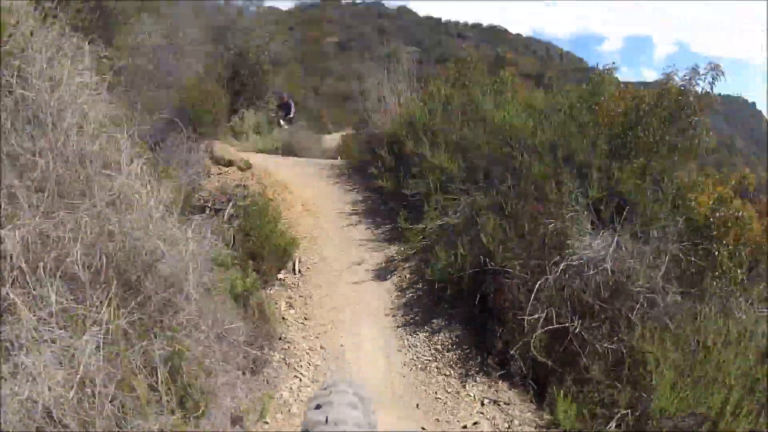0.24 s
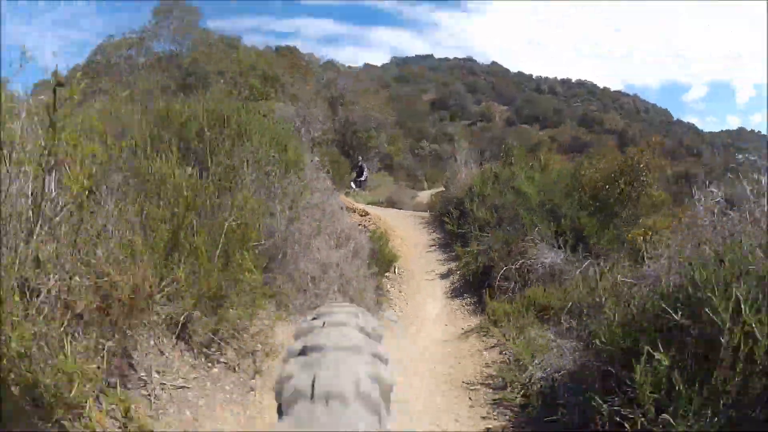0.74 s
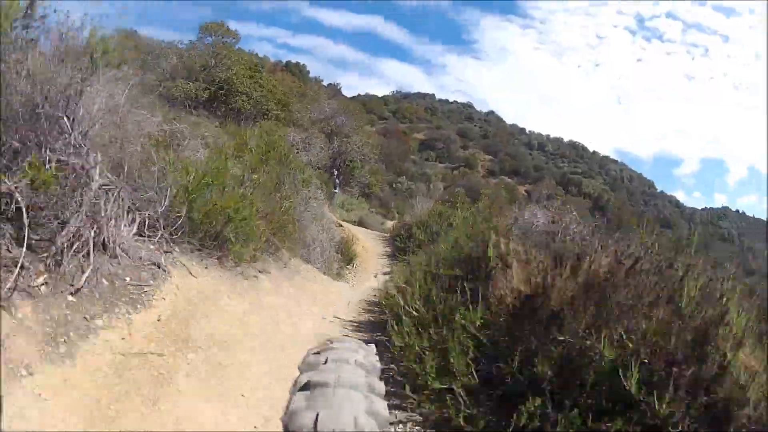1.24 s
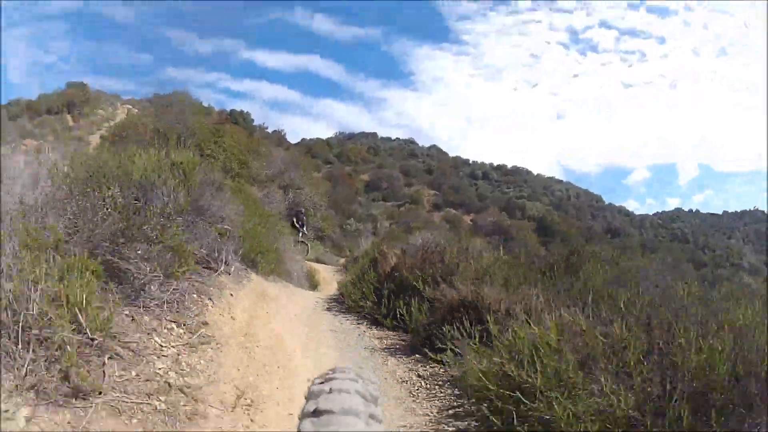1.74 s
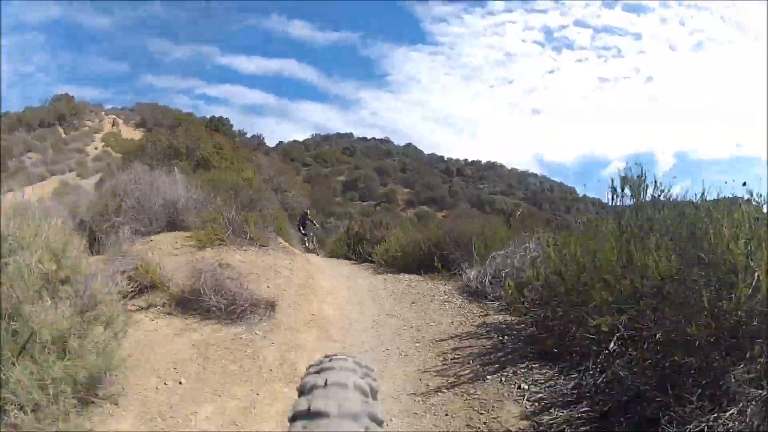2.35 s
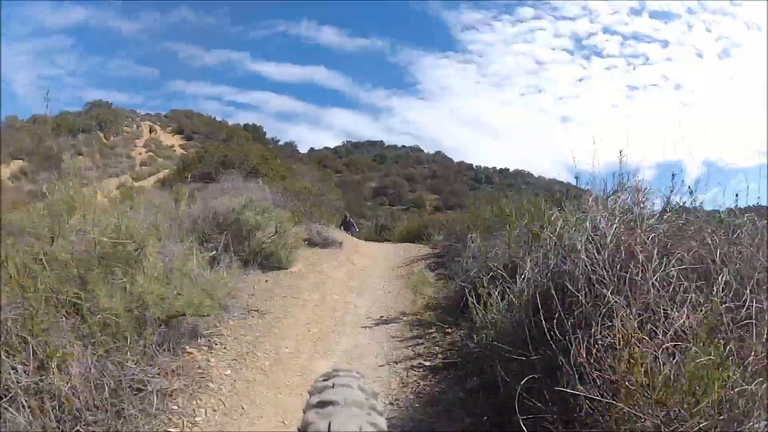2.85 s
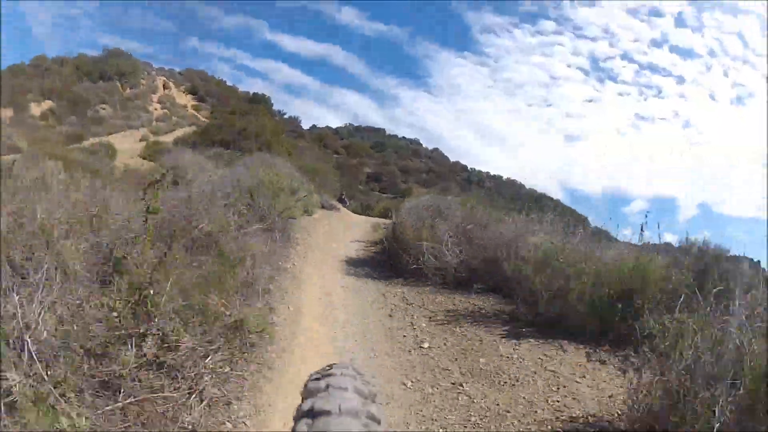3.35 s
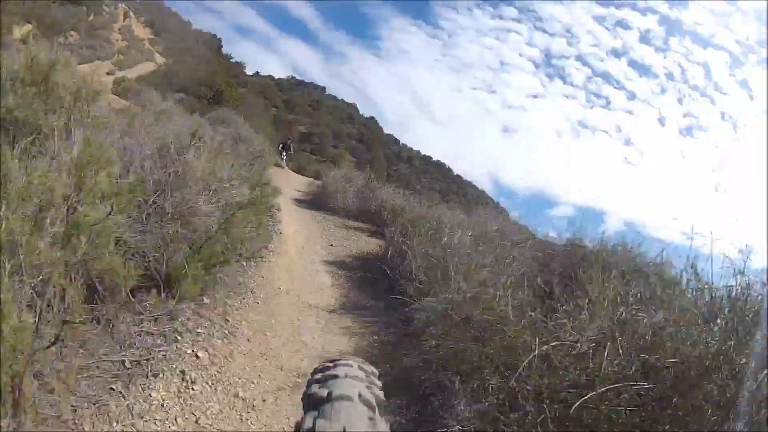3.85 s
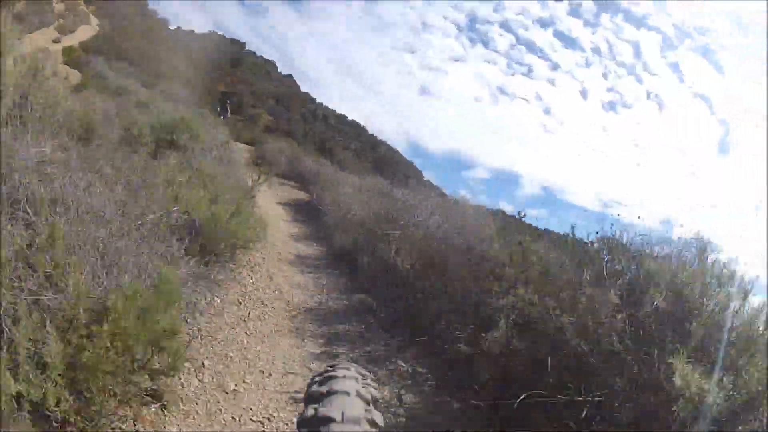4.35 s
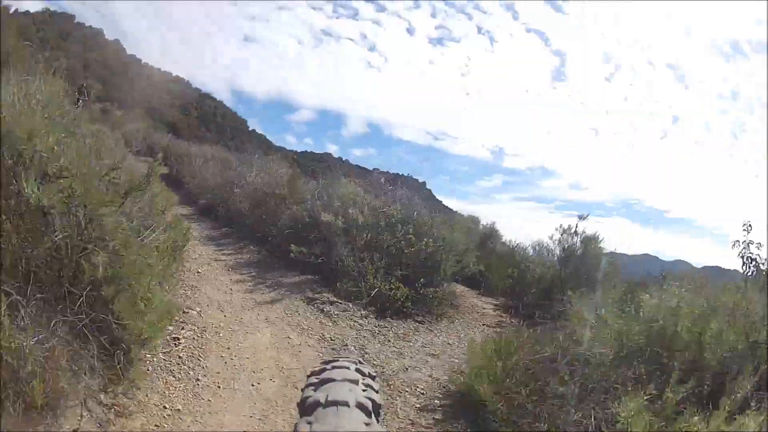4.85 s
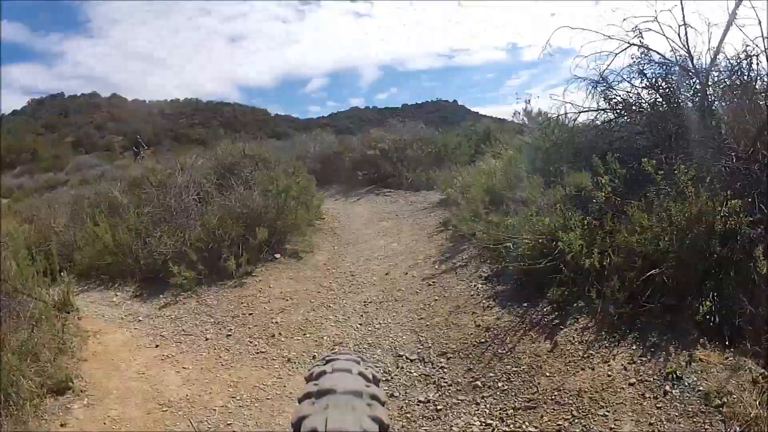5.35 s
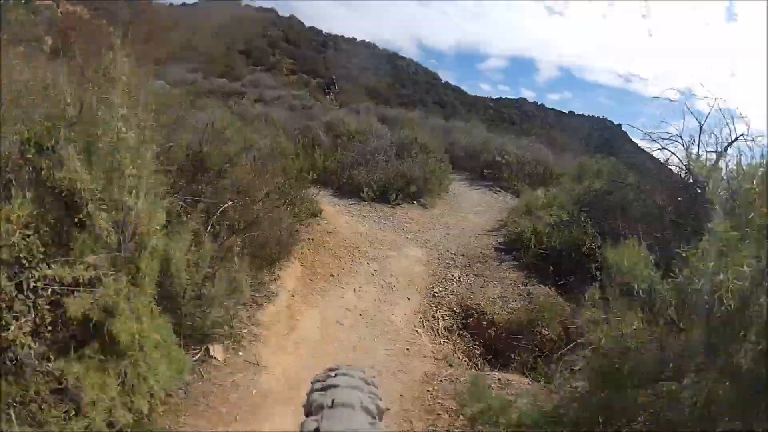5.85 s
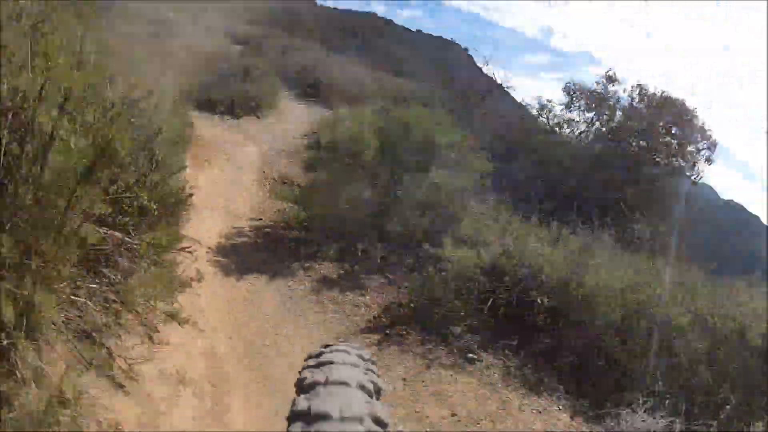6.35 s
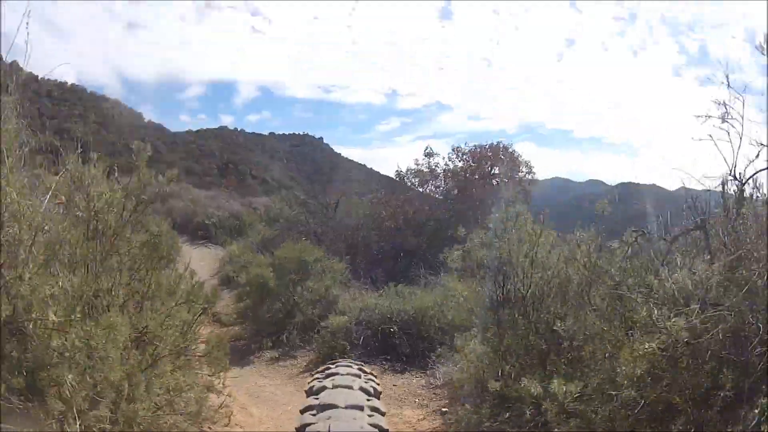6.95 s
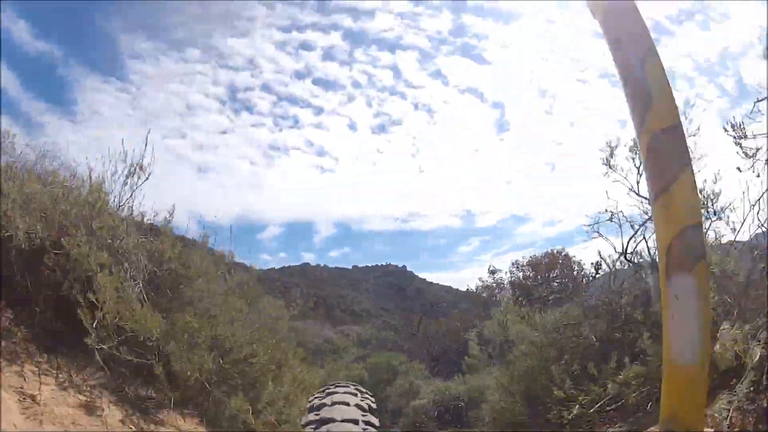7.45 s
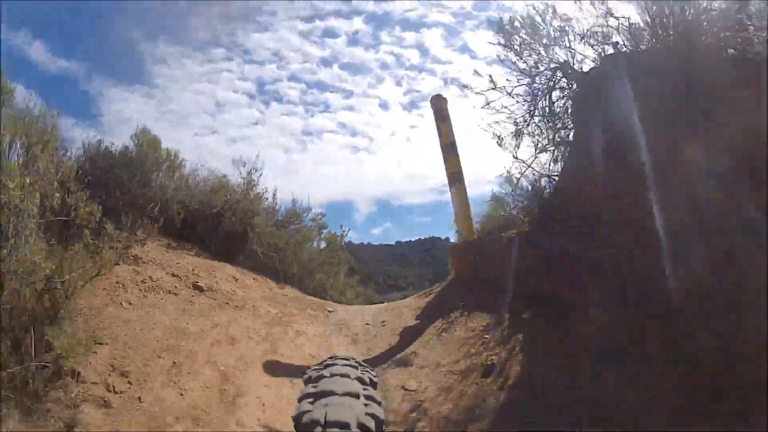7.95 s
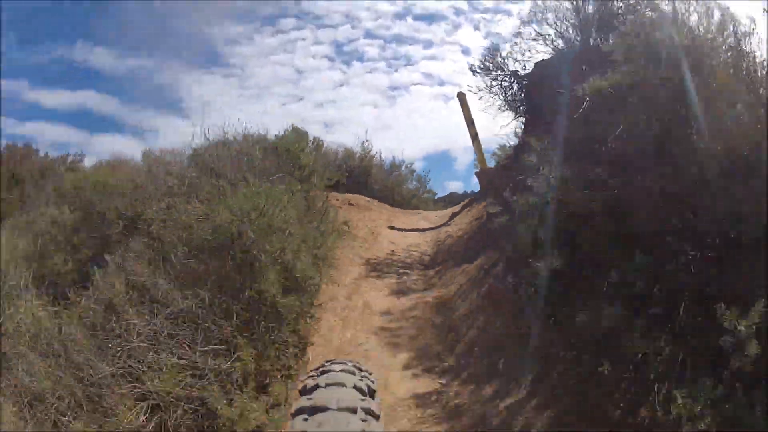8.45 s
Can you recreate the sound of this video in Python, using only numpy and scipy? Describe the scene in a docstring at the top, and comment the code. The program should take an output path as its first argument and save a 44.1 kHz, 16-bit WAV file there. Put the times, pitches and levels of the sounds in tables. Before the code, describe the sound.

Gritty, boxy action-camera sound of a bike on rocky dirt: droning shaky rumble, irregular hard clacks and rattles, muffled thuds, thin gravel hiss.

```python
"""A mount boom on a mountain bike sways in two low bending modes, noise-driven, on a rough dirt trail.
The camera's sound comes through the clamp and housing: lumpy rumble of tyre and wind, gravel noise
ringing the housing modes, a loose part knocking on them, dull damped thumps of stones, rough hums.
The recorder ducks after strong sharp sounds, clips, and holds every sample of a slow converter."""
import sys
import numpy as np
from scipy import signal
from scipy.fft import rfft, irfft
from scipy.io import wavfile
from scipy.ndimage import uniform_filter1d

SR = 44100
rng = np.random.default_rng(int(sys.argv[2]) if len(sys.argv) > 2 else 0)


def master(y):
    """Save y as 16-bit WAV."""
    cut = np.clip(np.atleast_2d(y).T, -1, 1)
    pcm = np.round(cut * 32767)  # scale
    wavfile.write(sys.argv[1], SR, pcm.astype(np.int16))


N = 383222

# low mount mode along the trail: time_s, level_db
SWAY = [(0.0, -33), (0.51, -29), (0.84, -40), (1.01, -31.5), (1.74, -43.5), (2.15, -26), (2.35, -38),
        (2.42, -29), (2.66, -37.5), (3.95, -29), (4.09, -34.5), (4.36, -25), (4.55, -38.5), (4.62, -26),
        (4.74, -44.5), (4.81, -30), (4.98, -26), (5.13, -34.5), (5.3, -25), (5.66, -47.5), (5.95, -26.5),
        (6.05, -37), (6.17, -27.5), (6.34, -40), (6.61, -35), (7.07, -43.5), (7.33, -30.5), (7.43, -40),
        (7.53, -27), (7.67, -42), (7.91, -28.5), (8.08, -39.5), (8.18, -28), (8.69, -35)]
# upper mount mode along the trail: time_s, level_db
BOUNCE = [(0.0, -41.5), (0.53, -28.5), (0.6, -35.5), (0.82, -25), (0.87, -51), (0.94, -30), (1.09, -35),
          (1.16, -28), (1.21, -48), (1.28, -30.5), (1.33, -41.5), (1.43, -28.5), (1.84, -33.5),
          (1.91, -26.5), (2.13, -34.5), (2.47, -31), (2.52, -40.5), (2.61, -30.5), (4.01, -31), (4.11, -39),
          (4.16, -28.5), (4.45, -44.5), (4.53, -32), (5.42, -37.5), (5.44, -31), (5.64, -51.5),
          (6.02, -31.5), (6.05, -37.5), (6.22, -32.5), (6.75, -42.5), (6.8, -34), (7.02, -56), (7.16, -43),
          (7.62, -35.5), (7.65, -23), (7.72, -39.5), (7.89, -32), (8.06, -37), (8.15, -34), (8.69, -39)]
# housing modes: centre_hz, width_hz, gravel_db (relative), knock_db (relative)
HOUSING = [(342, 10.4, -5, -20), (536.5, 90, 2.5, -25), (770, 59, -1, -7.5), (940, 57, 3, -10),
           (1055, 120, -2.5, -6), (1698, 163, -3, 4.5), (2049, 93, -12, -4), (2387, 136, -7.5, -3),
           (2517, 30, -22, -12), (3084, 53, -32, -13.5), (2964, 330, -11, -20), (3450, 210, -14, -10.5),
           (3480, 320, -26, -5.5)]
# gravel under the tyre: time_s, buzz_db
GRAVEL = [(0.0, -61), (0.22, -57.5), (0.36, -52.5), (0.58, -55.5), (0.72, -64.5), (1.55, -54),
          (1.67, -50.5), (1.84, -66), (2.05, -55.5), (2.54, -53), (2.98, -50.5), (3.56, -50.5), (3.82, -52),
          (4.14, -47.5), (4.31, -53), (4.72, -52), (5.49, -53.5), (5.93, -59.5), (6.41, -52), (6.61, -57.5),
          (6.85, -67), (7.07, -66), (7.45, -49.5), (7.6, -49), (7.96, -54), (8.15, -56), (8.3, -48.5),
          (8.69, -52.5)]
# loose part against the housing: start_s, level_db, length_s, tilt_db_per_octave, middle_ring_db
KNOCKS = [(.0144, -31.5, 0.0011, -7, 20), (0.127, -35.5, 0.0008, 15, 1), (.2276, -32.5, 0.0047, 15, 2),
          (0.3017, -29.5, 0.0061, 12, 6), (0.353, -43, 0.0072, 13, 12), (0.413, -43, 0.002, 9, 0),
          (0.464, -40, 0.0096, -3, 5), (0.599, -39, 0.021, 11, 5), (0.648, -34.5, 0.0031, -4, -10),
          (0.714, -47, 0.0084, -8, 5), (0.927, -28.5, 0.0077, 2.5, -17), (0.976, -31, .006, 7, -7),
          (1.1945, -20, .0057, -5, 12.5), (1.321, -37, 0.0056, 4, -12), (1.6398, -19, 0.0071, -3, 14),
          (1.7196, -22.5, 0.0032, 5.5, 4), (1.839, -42.5, .0074, -3, -10), (1.892, -40, 0.0052, 9.5, -9),
          (2.279, -38.5, 0.0047, -7.5, -18), (2.674, -35, 0.0059, 7, -3), (2.699, -39, .0056, 3, -5),
          (2.7364, -36, 0.0037, 11, 2), (2.817, -38, 0.0028, 6, -3), (2.8486, -40, 0.0039, 10, -4),
          (2.888, -34.5, 0.011, 1, -10), (3.5463, -34.5, 0.0031, 4, -7), (3.8407, -29, 0.0034, 3, -11),
          (3.973, -33, 0.0027, 3, -13), (4.083, -24, 0.004, 1, 10), (4.19, -45, 0.0037, 10, -5),
          (4.2757, -29.5, 0.0026, -4.5, -6), (4.398, -43.5, 0.0073, -12, 10),
          (4.577, -41.5, .0067, -5, -11), (4.642, -33.5, 0.0049, 9, -7), (4.71, -40, 0.015, -0.5, -1),
          (4.796, -38, 0.0095, -3, 0), (4.812, -30, 0.0084, 2, -11), (5.091, -23, 0.0052, -1.5, 6),
          (5.1228, -19.5, .0036, -4, 5), (5.18, -37, .0055, -5, -6), (5.316, -33, 0.005, 8, -6),
          (5.3394, -22.5, 0.0034, 2, -3), (5.481, -19.5, 0.0055, 2.5, -1), (5.571, -39, .0084, 10, 1),
          (5.6014, -17, .006, 17.5, 15), (5.721, -27.5, 0.0025, 18, 4), (5.824, -47, 0.0079, 22, 4),
          (5.898, -39.5, 0.008, -5.5, -15), (6.0445, -19.5, 0.0059, 1.5, 3.5),
          (6.114, -34.5, 0.0082, 4.5, -5), (6.2466, -34, 0.0044, -11, -4), (6.26, -20.5, 0.0045, 3, -0.5),
          (6.296, -33.5, 0.014, 0, -8), (6.339, -24.5, 0.0044, 4, -4), (6.4358, -22.5, .0047, 1, 5),
          (6.587, -38, 0.01, 8, 11), (6.6002, -19, 0.0059, 5, 3), (6.8804, -18.5, 0.0074, 3.5, -1.5),
          (6.978, -22, 0.0047, 0.5, -7), (7.095, -50.5, .0067, 11, -7), (7.386, -42.5, 0.022, 3, 3),
          (7.446, -36, 0.0063, -11.5, 4), (7.5015, -37.5, 0.012, -4, 8), (7.55, -33, 0.0023, 5, -1),
          (7.6814, -19.5, 0.0073, 9, -1), (7.939, -37.5, 0.0027, -4, 0), (7.9507, -17.5, 0.001, 1, 0),
          (8.0965, -31.5, 0.0097, -8, -4), (8.315, -38, 0.006, -6.5, 7), (8.336, -18, 0.005, -1.5, -11),
          (8.407, -37, .0064, 9.5, -2), (8.4476, -25.5, 0.0042, -3.5, -10), (8.532, -34, 0.0022, -5, -20.5),
          (8.546, -33.5, 0.0049, -4, 8), (8.5764, -20, .0026, -2, 2.5)]
# stones under the tyre: start_s, level_db, pitch_hz
THUMPS = [(0.475, -32, 270), (0.522, -38, 283), (0.686, -25.5, 231), (0.772, -24.5, 236), (1.131, -26, 266),
          (1.638, -24.5, 280), (1.893, -29, 322), (2.25, -29, 299), (2.436, -26, 320), (2.557, -37, 342),
          (2.617, -28, 322), (2.697, -23, 278), (2.916, -27, 285), (3.204, -27, 234), (3.257, -30, 335),
          (3.371, -43, 231), (3.453, -40, 231), (3.99, -27.5, 318), (4.158, -31.5, 345),
          (4.372, -32.5, 262), (4.582, -29, 248), (4.965, -38.5, 256), (5.596, -29, 223),
          (6.043, -25.5, 232), (6.975, -43, 555), (7.17, -41, 231), (7.52, -28, 237), (7.681, -25, 355),
          (7.806, -32.5, 231), (8.101, -36, 366), (8.334, -29, 336), (8.444, -29.5, 530), (8.53, -40, 546)]


def gain_of(db):
    """Decibels to gain."""
    return 10 ** (np.asarray(db) / 20)


def evened(x):
    """Scales to rms 1."""
    return x / np.sqrt(np.mean(x ** 2) + 1e-20)


def smooth_noise(count, span):
    """Slow chance wander of rms 1: white noise averaged over span samples."""
    return evened(uniform_filter1d(rng.standard_normal(count), span))


def add(mix, start_s, sound):
    """Mixes a sound in at start_s."""
    part = mix[round(start_s * SR):][:len(sound)]
    part += sound[:len(part)]


def resonate(x, hz, width_hz):
    """Complex ringing of one mode driven by x, filter gain about 1 at its centre."""
    pole = np.exp((2j * np.pi * hz - np.pi * width_hz) / SR)
    return signal.lfilter([1 - abs(pole)], [1, -pole], x)


def curve(table, column):
    """One column of a table, interpolated for every sample."""
    rows = np.array(table)
    return np.interp(np.arange(N) / SR, rows[:, 0], rows[:, column])


def trail(level_db, swell_db):
    """A level along the trail with chance swelling of rms swell_db, as a gain."""
    span = round(0.034 * SR)
    wander = evened(uniform_filter1d(uniform_filter1d(rng.standard_normal(N), span), span))
    return gain_of(level_db + swell_db * wander)


def with_bursts(level_db, bursts):
    """Adds the power of bell-shaped bursts (centre_s, level_db, half_length_s) to a level."""
    t = np.arange(0, N / SR, 1 / 500)
    power = np.zeros(len(t))
    for centre_s, burst_db, half_s in bursts:
        power += gain_of(2 * burst_db) * np.exp(-((t - centre_s) / half_s) ** 2)
    return 10 * np.log10(gain_of(2 * level_db) + np.interp(np.arange(N) / SR, t, power))


def by_chance(count):
    """Random moments, the gravel level there, and two normal numbers each."""
    start_s = rng.random(count) * N / SR
    a, b = rng.standard_normal((count, 2)).T
    return zip(start_s, np.interp(start_s, *np.transpose(GRAVEL)), a, b)


def mount():
    """Noise rings each low mode; its level swings are partly evened out."""
    # low bending modes: centre_hz, width_hz, steadiness (0-1)
    mount_modes = [(45, 5, .8), (146, 8, .7)]
    build_db, lead_s, half_s = -15.5, 0.034, 0.022  # the upper mode swells before it throws the loose part
    build = [(start_s - lead_s, db + build_db, half_s) for start_s, db, *_ in KNOCKS]
    levels_db = curve(SWAY, column=1), with_bursts(curve(BOUNCE, column=1), build)
    out = np.zeros(N)
    for level_db, (hz, width_hz, steady) in zip(levels_db, mount_modes):
        ring = resonate(rng.standard_normal(N), hz, width_hz)
        ring = resonate(ring, hz, 3 * width_hz)
        ring = evened((ring / (abs(ring) + 1e-9) ** steady).real)
        driven = trail(level_db, swell_db=2.5) * ring
        out += 2 * resonate(driven, hz, 5.34 * width_hz).real  # the mode cannot follow sudden changes
    return out


def rumble():
    """Lumpy low noise of tyre and wind, with a burst around each listed thump."""
    # rumble spectrum: freq_hz, gain_db
    rumble_colour = [(12, -8), (22, -3), (60, 1), (85, 0), (115, 1), (190, -5), (260, -17), (450, -29),
                     (900, -45)]
    below_modes_db, jolt_db, jolt_half_s = -6, -7.5, 0.04
    freq_hz, colour_db = np.transpose(rumble_colour)
    bins_hz = np.fft.rfftfreq(N, 1 / SR)
    colour = gain_of(np.interp(np.log(bins_hz + 1), np.log(freq_hz), colour_db, -70, -70))
    lumps = gain_of(2.67 * smooth_noise(N, 500))
    noise = evened(irfft(rfft(lumps * rng.standard_normal(N)) * colour, N))
    level_db = (curve(SWAY, column=1) + curve(BOUNCE, column=1)) / 2 + below_modes_db
    jolts = [(start_s, db + jolt_db, jolt_half_s) for start_s, db, _ in THUMPS]
    return trail(with_bursts(level_db, jolts), swell_db=3) * noise


def buzz_db():
    """Gravel level: slow curve plus crunches and a short burst of gravel noise just after each listed knock."""
    # crunches of loose stones: centre_s, level_db, half_length_s
    crunch_bursts = [(0.487, -53, 0.033), (0.657, -45.5, 0.044), (0.972, -47, 0.046), (1.1, -46, 0.038),
                     (1.923, -47, 0.037), (2.39, -47, 0.048), (2.58, -43, 0.027), (2.69, -43, 0.024),
                     (3.813, -45, 0.083), (4.58, -49.5, 0.034), (4.72, -49, 0.018), (4.83, -49.5, 0.021),
                     (5.21, -53, 0.03), (6.121, -42, 0.021), (7.44, -45, 0.038), (7.54, -62, 0.027),
                     (7.817, -48.5, 0.014), (7.864, -45, 0.0061), (8.113, -52, 0.014), (8.17, -48.5, .025),
                     (8.452, -58.5, 0.01), (8.556, -47, .025), (8.69, -40.5, 0.0096)]
    after_db, delay_s, half_s = -30, 0.0081, 0.0088
    after = [(start_s + delay_s, db + after_db, half_s) for start_s, db, *_ in KNOCKS]
    return with_bursts(curve(GRAVEL, column=1), crunch_bursts + after)


def gravel():
    """A hiss of tiny shocks and clumps of larger ticks ring the housing; each mode feels its own mix."""
    usual_db, usual_tilt_db = -56, 1  # treble tilt per octave at the usual buzz level
    dulling = 0.18  # tilt lost, dB per octave per dB of extra level
    clumps = gain_of(5.4 * smooth_noise(N, 3000))
    struck = rng.random(N) < 90 * clumps / SR
    size = gain_of(5.8 * np.minimum(rng.exponential(1, N), 4)) * struck
    ticks = evened(np.sqrt(signal.lfilter([1], [1, -.985], size ** 2)))
    flutter = gain_of(0.78 * smooth_noise(N, 700))
    level_db = buzz_db()
    tilt_db = usual_tilt_db - dulling * (level_db - usual_db)
    out = np.zeros(N)
    for hz, width_hz, mode_db, _ in HOUSING:
        patchy = gain_of(3.4 * smooth_noise(N, 1500))
        envelope = flutter * patchy + 0.43 * ticks * (hz / 1000) ** 0.68
        shocks = envelope * rng.standard_normal(N)
        ring = resonate(resonate(shocks, hz, width_hz), hz, 4.4 * width_hz).real
        out += gain_of(mode_db + tilt_db * np.log2(hz / 800)) * ring / np.sqrt(width_hz)
    return gain_of(level_db) * evened(out)


def knocks():
    """A blow rings the housing modes for a few ms, then the ring is cut short; it also kicks the mount."""
    tap_count, tap_db, tap_length_s = 45, 2, 0.0055  # faint chance knocks, level relative to the gravel curve
    spread_db = 5  # full range of mode level from knock to knock
    out, t = np.zeros(N), np.arange(2600) / SR
    hz, width_hz, _, mode_db = np.transpose(HOUSING)[:, :, None]
    octaves = np.log2(hz / 1950)
    middle = np.exp(-(octaves / 0.28) ** 2)
    taps = [(start_s, db + tap_db + 3 * a, tap_length_s, 0.5 + 6 * b, 0)
            for start_s, db, a, b in by_chance(tap_count)]
    rows = KNOCKS + taps
    chance = rng.random((len(rows), 3, len(HOUSING), 1))
    chatter = rng.standard_normal((len(rows), len(HOUSING), len(t)))
    for row, (phase, detune, spread), noise in zip(rows, chance, chatter):
        start_s, level_db, length_s, tilt_db, ring_db = row
        gate = 1 / (1 + np.exp((t - length_s) / 0.00022))  # 1 until the ring is cut
        rattle = .5 * gate + gain_of(-33.5) / (1 + np.exp((t - .032) / 0.0033))  # a faint rattle follows
        swing = np.sin(2 * np.pi * (hz * (1 + 0.034 * (detune - .5)) * t + phase))
        swing = swing * gate * np.exp(-.4 * np.pi * width_hz * t)
        rough = np.array([resonate(rattle * z, f, w).real / np.sqrt(w / SR)
                          for z, f, w in zip(noise, hz[:, 0], 0.93 * width_hz[:, 0])])
        mode_gain = gain_of(mode_db + tilt_db * octaves + ring_db * middle + spread_db * (spread - .5))
        sound = (mode_gain * (swing + rough)).sum(0)
        onset_rms = np.sqrt(np.mean(sound[:250] ** 2))
        sound = np.tanh(0.55 * sound / onset_rms)  # overload flattens the peaks
        kick = 0.25 * np.sin(2 * np.pi * 150 * t) * np.exp(-t / 0.003)
        add(out, start_s, gain_of(level_db) * (sound + kick))
    return out


def thumps():
    """Dull blows of stones: one damped, slightly rough swing with a soft start."""
    thud_count, thud_db = 25, 17.5  # chance thumps, level relative to the gravel curve
    t60_s, attack_s = 0.021, 0.0025
    out, t = np.zeros(N), np.arange(3000) / SR
    rows = THUMPS + [(start_s, db + thud_db + 4.2 * a, 270 * 1.02 ** b)
                     for start_s, db, a, b in by_chance(thud_count)]
    for start_s, level_db, hz in rows:
        rough = evened(resonate(rng.standard_normal(len(t)), hz, 145).real)
        swing = np.sin(2 * np.pi * hz * t) + 0.63 * rough
        add(out, start_s, swing * gain_of(level_db - 60 * t / t60_s) * (1 - np.exp(-t / attack_s)))
    return out


def hums():
    """Faint rough tones, wavering in pitch and level, that fade in and out."""
    # tones: start_s, peak_s, end_s, pitch_hz, rms_db_at_peak (before waver)
    hum_tones = [(5.62, 5.668, 5.73, 580, -51), (5.722, 5.78, 5.84, 580, -46),
                 (5.816, 5.86, 5.93, 632, -57.5), (6.885, 6.895, 6.95, 1150, -59),
                 (6.975, 6.987, 7.07, 1120, -54.5), (7.058, 7.178, 7.28, 578, -58.5)]
    edge_db = -10  # swell at both ends, before the taper
    out = np.zeros(N)
    for start_s, peak_s, end_s, hz, level_db in hum_tones:
        t = np.arange(start_s, end_s, 1 / SR)
        waver = gain_of(2.4 * smooth_noise(N // 20, 600))[:len(t)]
        drift = 1 + 0.017 * smooth_noise(N // 20, 300)[:len(t)]
        tone = np.sqrt(2) * np.sin(2 * np.pi * np.cumsum(drift * hz) / SR)
        swell_db = np.interp(t, [start_s, peak_s, end_s], [edge_db, 0, edge_db])
        taper = signal.windows.tukey(len(t), .2)
        add(out, start_s, gain_of(level_db + swell_db) * waver * tone * taper)
    return out


def scene():
    """Everything reaches one microphone through the housing."""
    return (mount() + rumble() + gravel() + knocks() + thumps() + hums())[None]


def record(dry):
    """Gain control ducks after sharp sounds, peaks clip, and the slow converter holds each sample."""
    threshold_db, recovery_db_per_s, duck_ratio = -38, 103.0, 0.62
    converter_hz, edge_hz, ceiling_db = 8000, 15550, -21.2
    sharp = signal.sosfilt(signal.butter(2, 1100, "high", fs=SR, output="sos"), dry[0])
    power_db = 10 * np.log10(abs(uniform_filter1d(sharp ** 2, 130)) + 1e-12)
    fall_db = np.arange(N) * recovery_db_per_s / SR
    held_peak_db = np.maximum.accumulate(power_db + fall_db) - fall_db
    over_db = np.maximum(held_peak_db - threshold_db, 0)
    late_db = np.r_[np.zeros(260), uniform_filter1d(over_db, 60)][:N]  # the gain reacts a few ms late
    ducked = dry[0] / gain_of(duck_ratio * late_db)
    slow = signal.resample_poly(ducked, converter_hz // 100, SR // 100, window=("kaiser", 5))
    ceiling = gain_of(ceiling_db)
    slow = np.clip(slow, -ceiling, ceiling)
    # each sample repeated 6 times, then back to SR: images of the slow rate remain
    held = signal.resample_poly(np.repeat(slow, 6), SR // 300, 6 * converter_hz // 300)[:N]
    held = np.pad(held, (0, N - len(held)))
    lowpass = signal.firwin(255, edge_hz, window=("kaiser", 9), fs=SR)
    return signal.oaconvolve(held, lowpass, "same")[None]


dry = scene()
out = record(dry)
master(out)
```